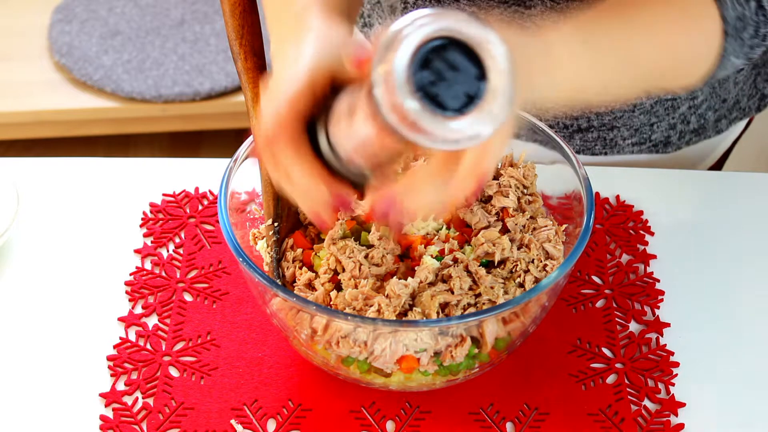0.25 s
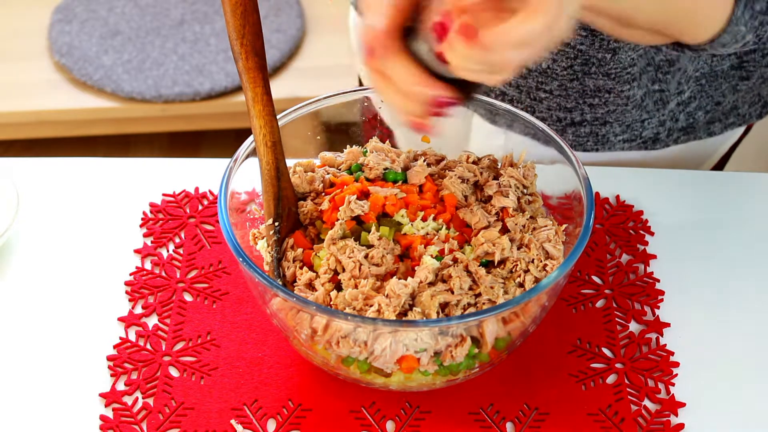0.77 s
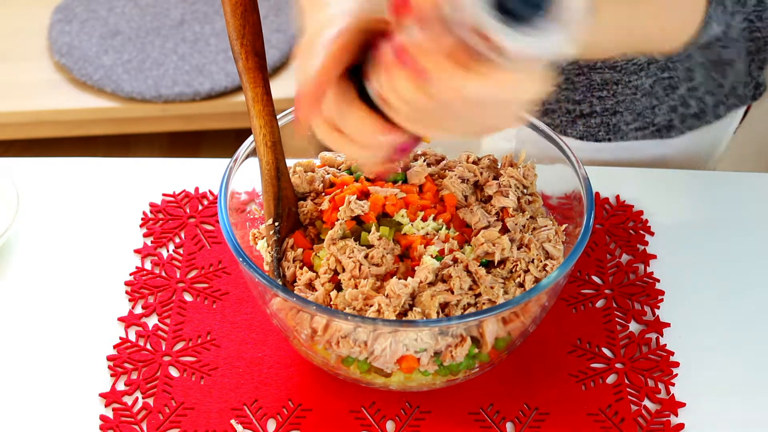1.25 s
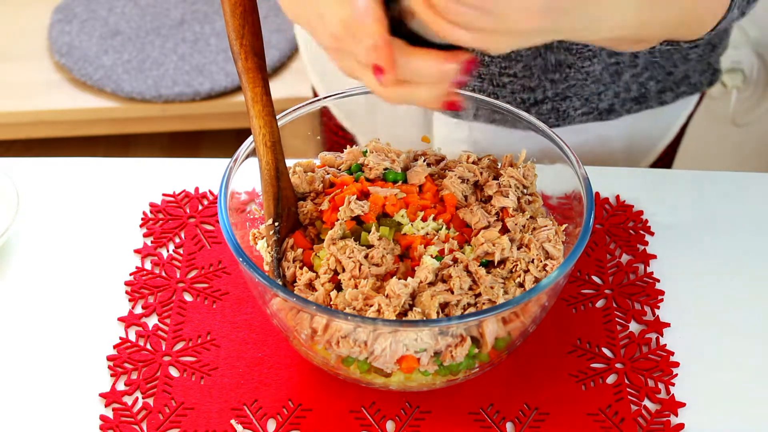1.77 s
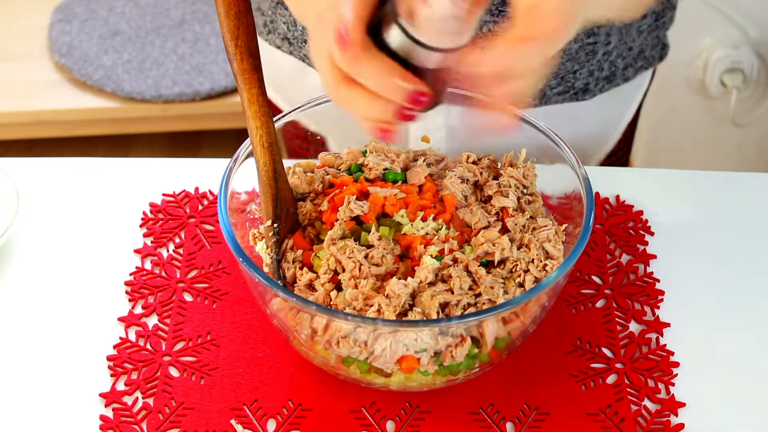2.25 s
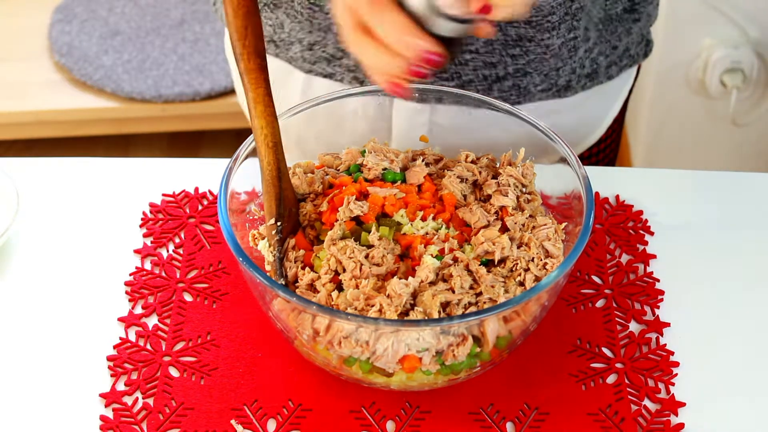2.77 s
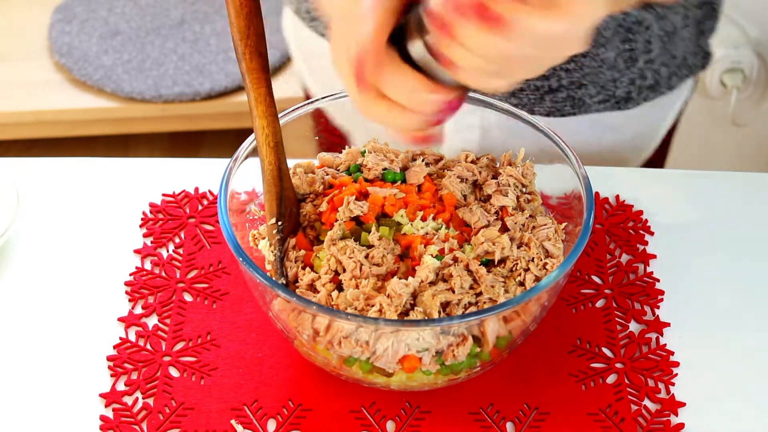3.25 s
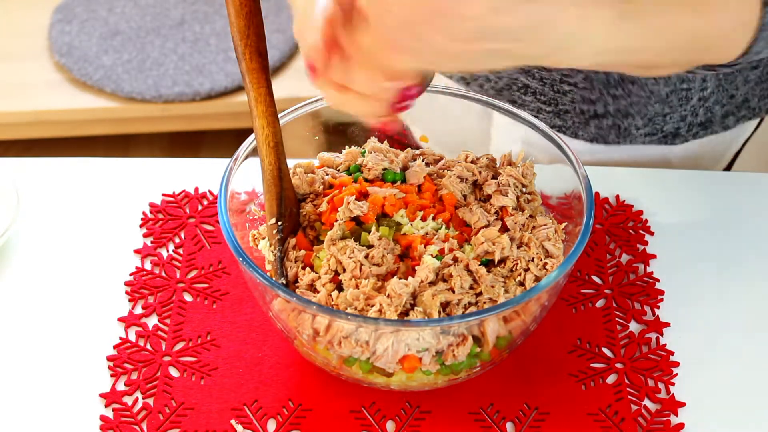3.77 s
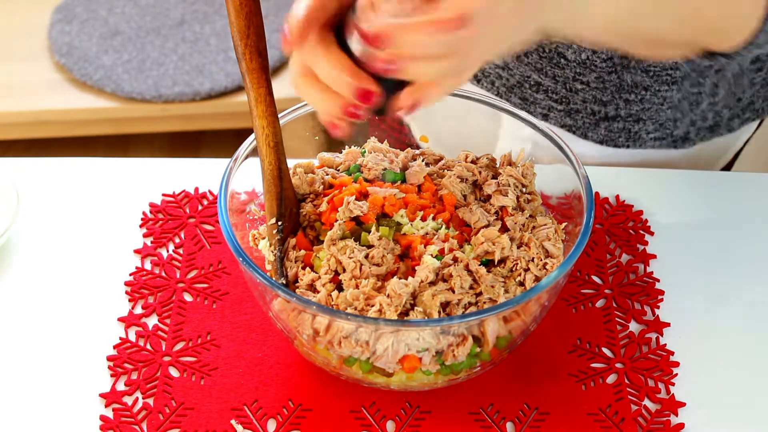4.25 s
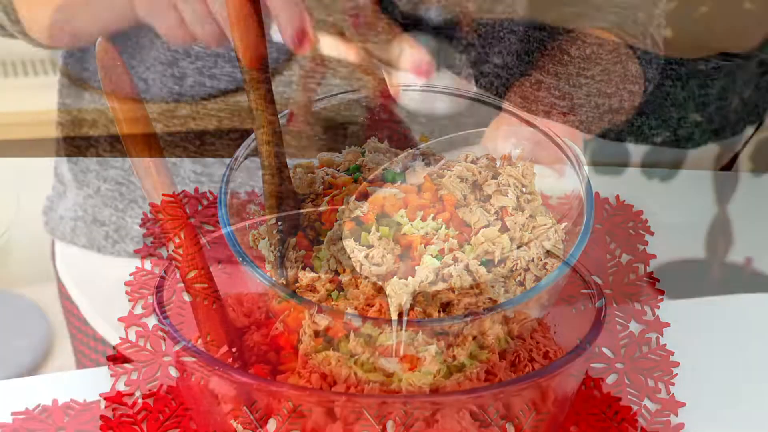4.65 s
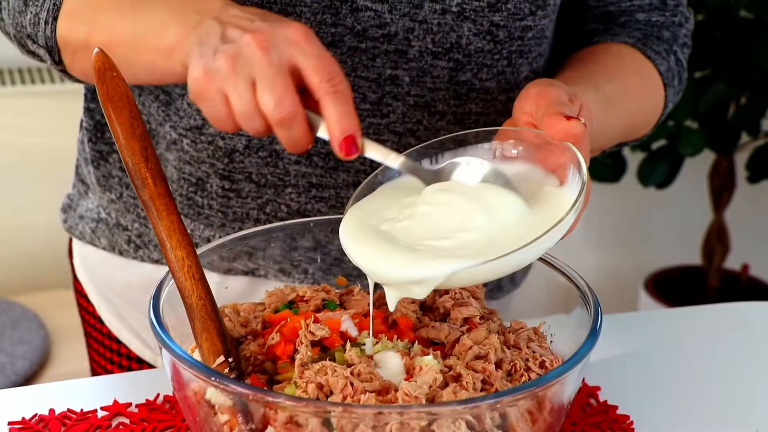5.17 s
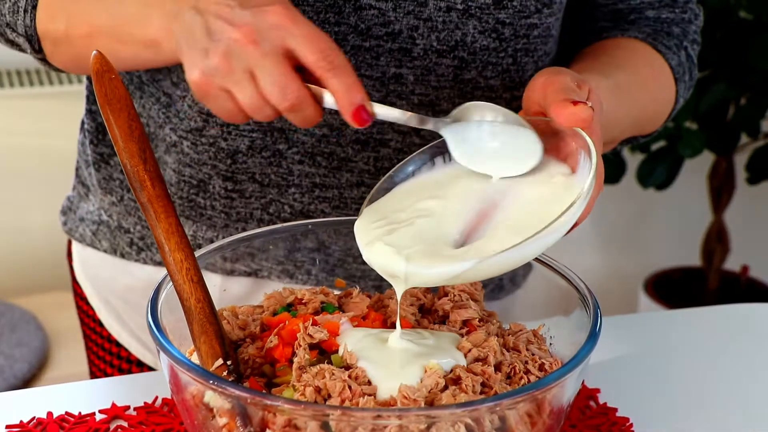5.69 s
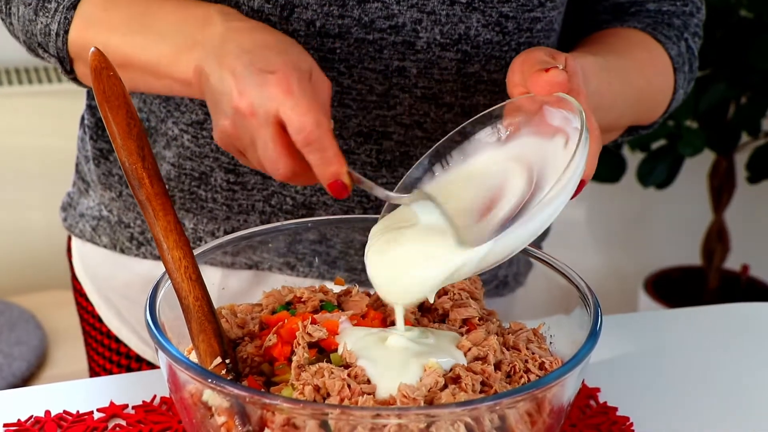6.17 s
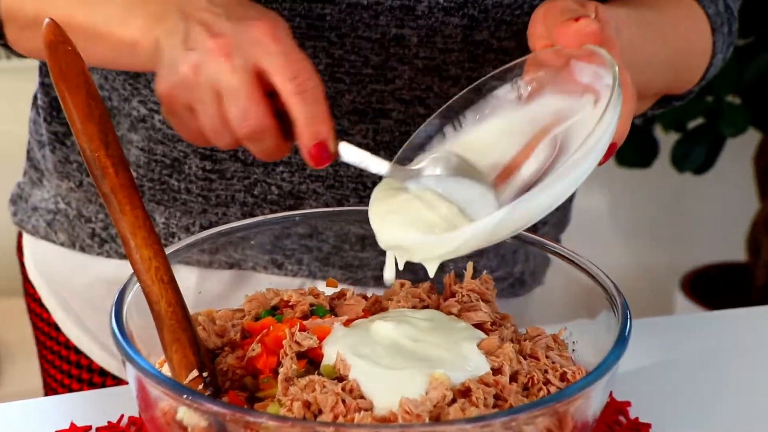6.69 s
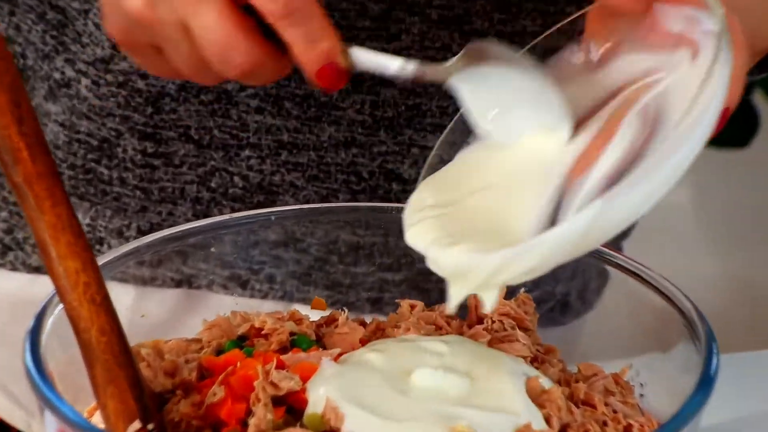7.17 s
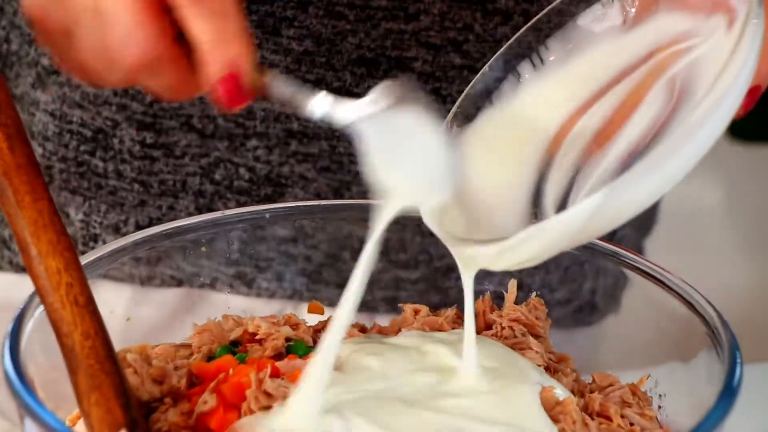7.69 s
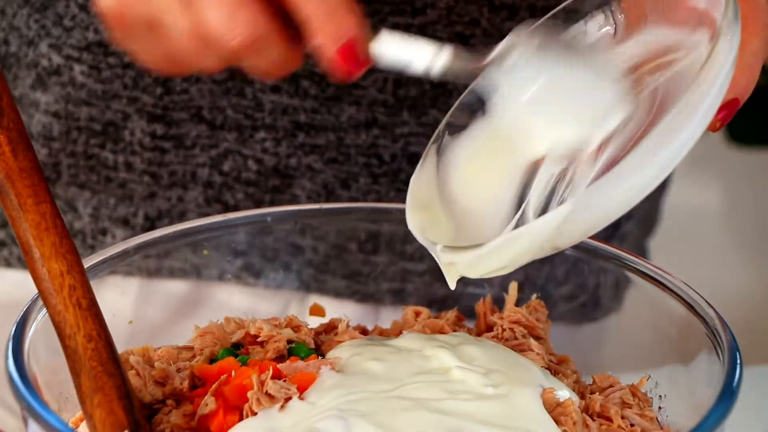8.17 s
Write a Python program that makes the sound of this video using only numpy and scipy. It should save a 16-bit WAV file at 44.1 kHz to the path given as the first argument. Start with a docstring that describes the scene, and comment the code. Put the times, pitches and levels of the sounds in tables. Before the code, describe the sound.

In a quiet kitchen with faint room noise and low hum, a hand salt mill is heard close, in mono with softened treble. From 0 to about 4.5 seconds it makes twelve twists roughly 0.4 seconds apart, each a short gritty crunch coloured by the hollow barrel, many with sharp crystal cracks, strongest near 0.4 and 0.8. Between twists the idle burr chafes thinly, last around 4.7. The scene then opens into stereo. At 4.9 a steel spoon strikes a hand-held glass dish with a cluster of taps, a low thud and a short scrape. More damped taps and scrapes come at 5.8, 6.5, 7.0, 7.2, 7.9 and 8.3. Soft yoghurt-cushioned touches fall near 6.1, 6.7, 7.7 and 8.1, and a small, clearer spoon clink at 7.6. Hard surfaces add a short tail.

```python
"""A hand salt mill grinds in twelve twists, in mono: bursts of grit and cracks ring the modes of its barrel.
Faint room noise and hum run throughout; between twists the idle burr chafes in a narrow ring.
A second scene follows in stereo: a steel spoon taps and scrapes yoghurt out of a hand-held glass dish (damped
modes), with one low thud, touches cushioned by yoghurt (short sines) and a clink of the spoon (clean partials).
A hard kitchen answers the mill, dish and spoon with a short noise tail."""
import sys
import numpy as np
from scipy import signal
from scipy.fft import rfft, irfft, next_fast_len
from scipy.io import wavfile
from scipy.ndimage import map_coordinates

SR = 44100
rng = np.random.default_rng(int(sys.argv[2]) if len(sys.argv) > 2 else 0)


def output_pcm(signal):
    """Save a mono or channel-first signal as 16-bit PCM at the path in sys.argv[1].

    Samples are clipped to [-1, 1] before scaling.
    """
    pcm = np.clip(np.atleast_2d(signal).T, -1, 1) * 32767
    wavfile.write(sys.argv[1], SR, np.round(pcm).astype(np.int16))


N = 371763
GESTURE_N = round(.6 * SR)  # samples for one gesture with its tail
TILT_PIVOT_HZ = 2980  # where the brightness tilt is 0 dB


def amp(db):
    """Decibels to gain."""
    return 10 ** (np.asarray(db) / 20)


def unit(x):
    """Scaled to rms 1."""
    return x / np.sqrt(np.mean(x ** 2) + 1e-20)


def along(points, hz):
    """(Hz, value) points interpolated on a log frequency axis."""
    point_hz, value = np.transpose(points)
    return np.interp(np.log(hz + 1), np.log(point_hz + 1), value)


def filtered(x, response):
    """x times a complex response of frequency."""
    m = next_fast_len(x.shape[-1] + SR // 4)
    spectrum = rfft(x, m) * response(np.fft.rfftfreq(m, 1 / SR))
    return irfft(spectrum, m)[..., :x.shape[-1]]


def causal(points):
    """Minimum-phase response with the level of the (Hz, dB) points, by folding the cepstrum."""
    def response(hz):
        size = 2 * len(hz) - 2
        cepstrum = irfft(along(points, hz) * np.log(10) / 20)
        cepstrum[1:len(hz) - 1] *= 2
        cepstrum[len(hz):] = 0
        return np.exp(rfft(cepstrum[:size], size))
    return response


def modes(rows, hz):
    """One causal resonance, squared to steepen it, for each (Hz, width Hz before squaring, dB) row."""
    center, width, db = np.transpose(rows)[:, :, None]
    resonance = 1j * hz * width / (center * center - hz * hz + 1j * hz * width)
    return amp(db) * resonance ** 2


def grit(count, rate, spread_db, hiss):
    """Random clicks of uneven size (rate per s) on a share of hiss."""
    size = amp(spread_db * np.minimum(rng.exponential(size=count), 3.5))
    grains = (rng.random(count) < rate / SR) * rng.standard_normal(count) * size
    return unit(unit(grains) + hiss * rng.standard_normal(count))


def lumps(count, rate, depth_db):
    """Gain that wanders at random, rate changes a second."""
    knots = rng.standard_normal(count // 100)
    return amp(depth_db * map_coordinates(knots, [np.arange(count) * rate / SR], order=1))


def gesture_db(rows, t, release_s):
    """Level at times t from (s, dB) rows; it dies 60 dB in release_s after them, in 37 ms backwards."""
    s, level_db = np.transpose(rows)
    outside = np.maximum(t - s[-1], 0) / release_s + np.maximum(s[0] - t, 0) / .037
    return np.interp(t, s, level_db) - 60 * outside


def add(out, x, s):
    """Mix x into out from second s."""
    part = out[:, round(s * SR):][:, :x.shape[1]]
    part += x[:, :part.shape[1]]


def impulses(rows, s0, s1, count):
    """Unit impulses scaled by dB for the rows that fall between s0 and s1."""
    x = np.zeros(count)
    for s, db in rows:
        if s0 <= s < s1:
            x[round((s - s0) * SR)] = amp(db)
    return x


# Decay of the kitchen. Each row: frequency in Hz, t60 in s.
KITCHEN_T60 = [(300, 0.13), (1500, 0.42), (4000, 0.35), (8000, 0.21), (15000, 0.13)]


def kitchen(x, wet_db, channels):
    """The sound plus a fresh noise tail in which each frequency dies at its own speed."""
    hz, t, z = signal.stft(rng.standard_normal((channels, SR // 2)), SR, nperseg=256)
    decay = amp(-60 * t / along(KITCHEN_T60, hz)[:, None])
    tail = signal.istft(z * decay, SR, nperseg=256)[1]
    tail = np.pad(tail / np.linalg.norm(tail[0]), ((0, 0), (round(.004 * SR), 0)))  # 4 ms predelay
    return x + amp(wet_db) * signal.fftconvolve(x, tail, axes=1)[:, :x.shape[1]]


# Twists of the mill. Each row: burr bites in s, rise in s, grinding at the bite in relative dB,
# wrist eases off in s, grinding there in relative dB, brightness in dB per octave.
MILL_TWISTS = [(0.0, .01, -16, 0.0033, -24, -1), (0.377, 0.019, -18, 0.44, -26.5, -1),
               (0.788, .016, -22.5, 0.85, -23.5, -0.5), (1.2, 0.022, -22, 1.254, -19, -0.5),
               (1.612, 0.023, -23.5, 1.643, -22.5, -0.5), (2.015, .024, -23, 2.081, -19, 0.5),
               (2.415, 0.024, -23.5, 2.473, -21, 1), (2.809, .016, -26, 2.858, -22, 1.5),
               (3.214, .028, -21, 3.276, -18.5, -0.5), (3.592, .012, -25.5, 3.65, -19.5, 0.5),
               (3.972, .012, -28.5, 4.06, -20, 2), (4.374, .012, -34, 4.426, -17, 1.5)]
# Crystals that split. Each row: time in s, level in relative dB.
CRYSTAL_CRACKS = [(0.3718, -2.5), (0.4233, -12), (0.7837, -3.5), (1.1923, -15.5), (1.5908, -35.5),
                  (2.8037, -10.5), (2.853, -11), (3.2061, -16), (3.5864, -11), (3.969, -12.5), (4.366, -21),
                  (4.4084, -19)]
# Colour of the crushing before the brightness tilt. Each row: frequency in Hz, gain in dB.
CRUSH_COLOUR = [(200, -37.5), (340, -21), (500, -26.5), (620, -23.5), (1100, -10), (1600, -1), (2700, -4),
                (4000, -5.5), (5000, -5), (7000, -9.5), (9000, -17), (16000, -25.5)]
# Fixed modes of the mill barrel, rung by every twist. Each row: frequency in Hz, width in Hz before squaring,
# gain in dB.
FIXED_BARREL_MODES = [(326.6, 26, 5), (622, 74, 6), (1554, 200, -10), (2048, 280, -8.5)]
TOUCH_DB, EASE_S, EASED_DB = -44, .11, -41  # relative level as a twist begins; time to slacken, level then


def mill():
    """Crystals shatter between burr and ring; each new grip leaves other modes of the barrel free."""
    out = np.zeros((1, N))
    for bite, rise, bite_db, ease, ease_db, bright_db in MILL_TWISTS:
        rows = [(bite - rise, TOUCH_DB), (bite, bite_db), (ease, ease_db), (ease + EASE_S, EASED_DB)]
        s0 = max(rows[0][0] - .01, 0)
        level_db = gesture_db(rows, s0 + np.arange(GESTURE_N) / SR, release_s=.12)
        crush = grit(GESTURE_N, rate=4000, spread_db=1.5, hiss=.66) * lumps(GESTURE_N, rate=90, depth_db=1.5)
        # a crystal breaks in several steps
        shatter = amp(-60 * np.arange(150) / SR / .004) * rng.choice([-1, 1], size=150)
        split = np.convolve(impulses(CRYSTAL_CRACKS, s0, s0 + .3, GESTURE_N), shatter)[:GESTURE_N]
        free_hz = 600 * np.exp(2.1 * rng.random(24))
        free_modes = np.transpose([free_hz, .05 * free_hz, np.full(24, -4)])
        colour = [(hz, db + bright_db * np.log2(hz / TILT_PIVOT_HZ)) for hz, db in CRUSH_COLOUR]

        def barrel(hz):
            ringing = modes(free_modes, hz).sum(0) + modes(FIXED_BARREL_MODES, hz).sum(0)
            return causal(colour)(hz) * (1 + ringing)

        crushed, cracked = filtered(np.array([crush, split]), barrel)
        close = (amp(level_db - 2) * crushed + amp(-1.5) * cracked) / np.std(crushed)
        add(out, kitchen(close[None], wet_db=-6.5, channels=1), s0)
    return out


# Treble loss of the first scene's microphone. Each row: frequency in Hz, gain in dB.
MONO_MIC_LOSS = [(8000, -0.5), (12000, -19.5), (15400, -31), (16200, -67)]
# Colour of the room noise. Each row: frequency in Hz, relative level in dB per Hz.
AIR_COLOUR = [(25, -10), (63, -15), (125, -13.5), (220, -3.5), (270, -12.5), (330, -0.5), (410, -1.5),
              (550, -21.5), (660, -7.5), (1000, -13.5), (2500, -18), (5000, -22.5), (10000, -22.5),
              (15500, -29.5), (16700, -36.5)]
# Stereo width of the room noise. Each row: frequency in Hz, left-right likeness 0-1.
AIR_LIKENESS = [(60, 0.91), (240, 0.31), (950, 0.35), (3770, 0.22), (15000, 0.12)]
# Stereo balance of the room noise. Each row: frequency in Hz, left minus right in dB.
AIR_LEAN = [(250, 0), (380, 18), (600, 1.5), (2400, -1)]
# Hum. Each row: frequency in Hz, rms before beating in dB in the first scene, in the second, beat depth 0-1.
HUM_TONES = [(47.5, -74, -76, .05), (143.6, -69.5, -85, .95)]
DISSOLVE_S = 4.24, 4.9  # the room fades from the first scene to the second
MONO_AIR_DB, STEREO_AIR_DB = -60.5, -62.5
BEAT_START_S, BEAT_PERIOD_S = .14, 1.017  # two machines beat


def room_tone():
    """Room noise and hum: one microphone in the first scene, two partly alike capsules in the second."""
    t = np.arange(N) / SR
    wide_share = np.interp(t, DISSOLVE_S, [0, 1])

    def mono_colour(hz):
        return amp(along(AIR_COLOUR, hz) + along(MONO_MIC_LOSS, hz))

    def stereo_colour(hz):
        return amp(along(AIR_COLOUR, hz) + np.outer([.5, -.5], along(AIR_LEAN, hz)))

    def angle(hz):
        return np.arccos(np.clip(along(AIR_LIKENESS, hz), -1, 1)) / 2

    mono = unit(filtered(rng.standard_normal(N), mono_colour))
    a, b = rng.standard_normal((2, N))
    shared = filtered(a, lambda hz: stereo_colour(hz) * np.cos(angle(hz)))
    opposed = filtered(b, lambda hz: stereo_colour(hz) * np.sin(angle(hz)) * [[1], [-1]])
    out = amp(MONO_AIR_DB) * (1 - wide_share) * mono
    out = out + amp(STEREO_AIR_DB) * wide_share * unit(shared + opposed)
    for hz, first_db, second_db, depth in HUM_TONES:
        swell = 1 + depth * np.cos(2 * np.pi * (t - BEAT_START_S) / BEAT_PERIOD_S)
        # the motors run unevenly
        flutter = 1 + .4 * depth * map_coordinates(rng.standard_normal(300), [t * 25])
        level = np.sqrt(2) * amp(first_db + wide_share * (second_db - first_db))
        out += level * swell * flutter * np.sin(2 * np.pi * hz * t)
    return out


# Slips of the idle burr while the hand turns back. Each row: firmest in s, relative dB, swell in s.
BURR_SLIPS = [(0.354, -43, 0.063), (0.77, -48.5, 0.076), (1.124, -49, .03), (1.178, -56.5, 0.034),
              (1.45, -51.5, 0.1), (1.584, -49.5, 0.14), (1.935, -49, 0.025), (1.99, -37.5, 0.077),
              (2.2, -44, 0.043), (2.372, -44.5, .06), (2.788, -49, 0.068), (3.19, -36.5, 0.044),
              (3.42, -46.5, 0.056), (3.574, -49, 0.094), (3.75, -40.5, 0.043), (3.83, -42, 0.025),
              (3.954, -56.5, 0.091), (4.218, -44, 0.15), (4.301, -44, .015), (4.348, -44, 0.032),
              (4.677, -37.5, 0.047), (4.722, -46.5, 0.026)]
# Ring of the burr. Each row: frequency in Hz, width in Hz before squaring, gain in dB.
BURR_MODES = [(4900, 420, -5.5), (5043, 320, -2), (7440, 1400, -19), (8950, 3000, -18), (11540, 380, -10)]
SWELL_DB, SLIP_RELEASE_S = 22, .12  # a slip grows this much, then dies 60 dB


def chafe():
    """Uneven slips excite the narrow ring of the burr."""
    t = np.arange(N) / SR
    level = np.zeros(N)
    for s, db, swell in BURR_SLIPS:
        level += amp(gesture_db([(s - swell, db - SWELL_DB), (s, db)], t, SLIP_RELEASE_S))
    slips = grit(N, rate=2800, spread_db=2, hiss=.5) * lumps(N, rate=60, depth_db=4.5)
    ring = filtered(slips, lambda hz: modes(BURR_MODES, hz).sum(0))
    return kitchen((amp(4.5) * level * unit(ring))[None], wet_db=-4.5, channels=1)


# Spoon strokes. Each row: lands in s, drag in relative dB, edge lifts in s, drag there in relative dB,
# brightness in dB per octave, bass in dB, width in Hz (before squaring) of the modes that grip and yoghurt
# leave free, list of those modes (Hz, dB before tilt).
SPOON_STROKES = [(4.8942, -45, 5.01, -30.5, -2, -0.5, 150, [(2450, 2), (3660, 5.5), (4900, 0.5),
                 (7470, 3)]), (5.7587, -37, 5.89, -49, -2, -4.5, 68.4, [(845, -2), (2450, 0.5), (3370, 9),
                 (6610, 4)]), (6.4977, -24.5, 6.56, -32, 3, 4.5, 149.6, [(1350, -6), (3500, 1.5), (5500, 0),
                 (8700, 0)]), (7.0063, -32.5, 7.11, -34.5, 3, 4, 80, [(1200, -7), (2500, 6), (3600, 3.5),
                 (7290, 2)]), (7.205, -30.5, 7.259, -32, -2, -1, 128, [(1215, -1.5), (2300, 6.5),
                 (2700, 3.5), (3900, 1)]), (7.9192, -25.5, 8.11, -44, 2, 0, 200.8, [(2650, 7.5), (4060, 10),
                 (6190, 6.5), (8050, -1.5)]), (8.2717, -23.5, 8.42, -33.5, 2, -2.5, 258.7, [(2250, 0),
                 (3950, 1), (6230, 2.5), (7600, 0)])]
# Spoon contacts on the dish. Each row: time in s, level in relative dB.
SPOON_TAPS = [(4.8943, 1), (4.9044, -6.5), (4.9114, -21.5), (4.961, -17), (4.9756, -8), (4.9795, -7.5),
              (5.7595, -19), (5.7658, -4.5), (5.7704, -20.5), (6.4981, -5.5), (7.0065, -3.5), (7.205, -13),
              (7.9189, -2.5), (7.9992, -21), (8.0825, -22), (8.2726, -4.5), (8.3035, -8), (8.3818, -13.5)]
# Damped modes of the dish. Each row: frequency in Hz, width in Hz before squaring, gain in dB before tilt.
DISH_MODES = [(370, 74, -17.5), (950, 290, -14), (1266, 360, -10), (1470, 350, -10), (2400, 300, -2.5),
              (2770, 220, -3), (3590, 380, -2.5), (3826, 494, -0.5), (5470, 200, -10.5), (5870, 150, -11),
              (6280, 950, -4.5), (7560, 330, -2.5), (8400, 780, -7), (9600, 890, -9.5), (10300, 1700, -14),
              (12000, 710, -16.5), (14000, 7300, -20)]
# The dragged edge is duller than a tap. Each row: frequency in Hz, gain in dB.
EDGE_COLOUR = [(6000, 0.5), (16000, -12)]
SETTLE_S, LIFT_S, LIFT_DB = .0093, .1, -23.5  # landing to drag; fade time and level change after the lift
BASS_TOP_HZ = 1800


def dish():
    """Taps and the dragged edge ring the dish; each mode reaches the two capsules with its own phase."""
    out = np.zeros((2, N))
    ends = [row[0] for row in SPOON_STROKES[1:]] + [N / SR]
    for stroke, end in zip(SPOON_STROKES, ends):
        s, drag_db, lift, lift_db, bright_db, bass_db, free_width, free = stroke
        rows = [(s + SETTLE_S, drag_db), (lift, lift_db), (lift + LIFT_S, lift_db + LIFT_DB)]
        ringing = np.array(DISH_MODES + [(hz, free_width, db) for hz, db in free])
        mode_hz = ringing[:, 0]
        tilt_db = bright_db * np.log2(mode_hz / TILT_PIVOT_HZ)
        ringing[:, 2] += np.where(mode_hz < BASS_TOP_HZ, bass_db, tilt_db)
        spread_rad = .5 + mode_hz / 9000  # short waves differ more between the capsules
        turn = np.exp(1j * spread_rad * rng.standard_normal((2, len(ringing))))
        s0 = s - .005
        drag = filtered(grit(GESTURE_N, rate=4000, spread_db=2, hiss=.75), causal(EDGE_COLOUR))
        # the spoon chatters as it lands
        chatter = np.r_[1, .3 * amp(-60 * np.arange(300) / SR / .012) * rng.standard_normal(300)]
        taps = np.convolve(impulses(SPOON_TAPS, s0, end - .005, GESTURE_N), chatter)[:GESTURE_N]
        dragged = filtered(drag, lambda hz: turn @ modes(ringing, hz))
        # the landing spoon damps the glass: wider modes
        tapped = filtered(taps, lambda hz: turn @ modes(ringing * [1, 2.2, 1], hz))
        level_db = gesture_db(rows, s0 + np.arange(GESTURE_N) / SR, release_s=.073)
        close = (amp(level_db) * dragged + amp(2) * tapped) / np.std(dragged)
        add(out, kitchen(close, wet_db=-8, channels=2), s0)
    return out * amp([[-1.5], [1.5]])


THUD_S, THUD_DB = 4.8945, -29  # peak level before the stereo lean


def thud():
    """The hardest tap jolts the hand: one low push without ring, peaking after 0.6 ms."""
    u = np.clip(np.arange(N) / SR - THUD_S, 0, .1) / .0006
    return amp(THUD_DB + np.array([[-2.2], [2.2]])) * u * np.exp(1 - u)


# Touches cushioned by yoghurt. Each row: time in s, relative level in dB, frequency in Hz.
YOGHURT_DABS = [(6.102, -52.5, 2690), (6.679, -33, 2600), (7.734, -47, 2930), (8.1, -33.5, 1000)]


def dabs():
    """Each cushioned touch is a sine that dies 60 dB in 23 ms, 0.8 rad apart between the capsules."""
    out, t = np.zeros((2, N)), np.arange(GESTURE_N) / SR
    for s, db, hz in YOGHURT_DABS:
        envelope = amp(db - 60 * t / .023) * (1 - np.exp(-t / .00039))
        dab = envelope * np.sin(2 * np.pi * hz * t + [[0], [.8]])
        add(out, kitchen(dab, wet_db=-5, channels=2), s)
    return out * amp([[-1.5], [1.5]])


# The free spoon touches the rim. Each row: time in s, level in relative dB.
RIM_CLINKS = [(7.572, -33)]
# Partials of the spoon. Each row: frequency in Hz, relative level in dB, t60 in s.
SPOON_PARTIALS = [(953, -10, 0.38), (2175, 5, 0.3), (3770, -11, 0.22), (5330, -17, 0.06), (7210, -7, 0.13),
                  (9238, -15, .1)]
GRIP_S = .12  # fingers stop the ring


def clink():
    """The undamped spoon rings in clean partials until the fingers stop it."""
    out, t = np.zeros((2, N)), np.arange(SR // 2) / SR
    ring = np.zeros((2, len(t)))
    for hz, db, t60 in SPOON_PARTIALS:
        phase = rng.normal(0, .84, (2, 1))
        ring += amp(db - 60 * t / t60) * np.sin(2 * np.pi * hz * t + phase)
    onset = 1 - np.exp(-t / .00028)
    grip = amp(-60 * np.maximum(t - GRIP_S, 0) / .039)
    for s, db in RIM_CLINKS:
        add(out, kitchen(amp(db - 11.5) * ring * onset * grip, wet_db=-10.5, channels=2), s)
    return out * amp([[-3.5], [3.5]])


def scene():
    """Mill through its duller microphone, then dish and spoon in stereo, over the room."""
    first = filtered(mill() + chafe(), causal(MONO_MIC_LOSS))
    second = dish() + thud() + dabs() + clink()
    return first + second + room_tone()


TOP_HZ = 16700


def record(dry):
    """A soft limit keeps the highest peaks below full scale; nothing passes above the band limit."""
    limited = dry / (1 + np.abs(dry / .85) ** 6) ** (1 / 6)
    return filtered(limited, lambda hz: hz < TOP_HZ)


dry = scene()
out = record(dry)
output_pcm(out)
```